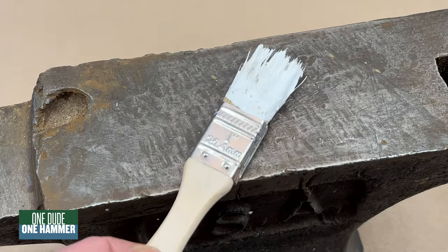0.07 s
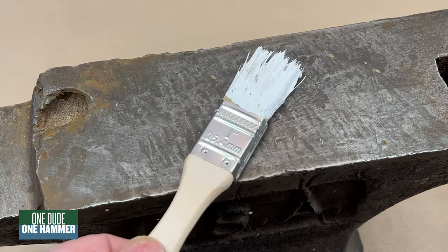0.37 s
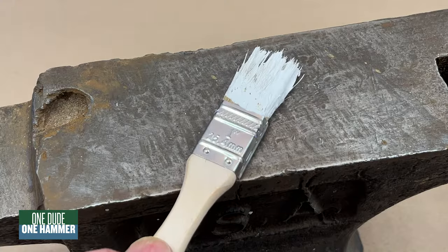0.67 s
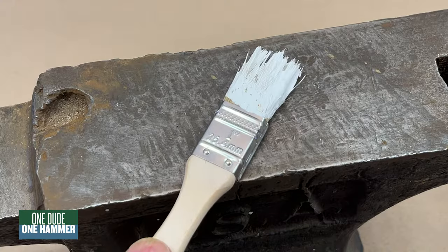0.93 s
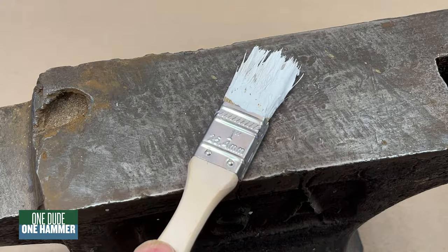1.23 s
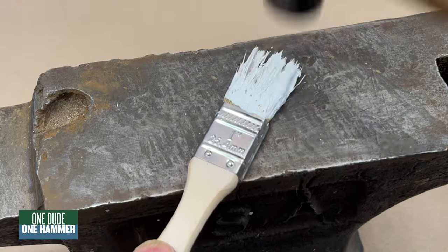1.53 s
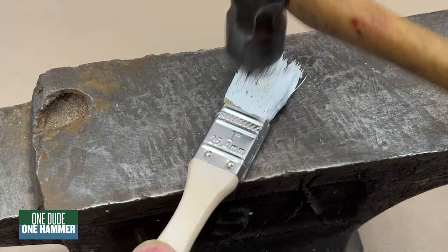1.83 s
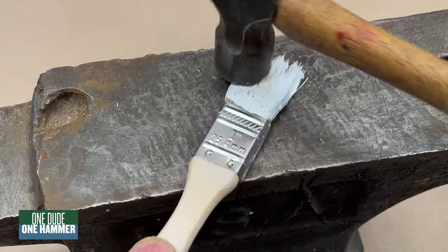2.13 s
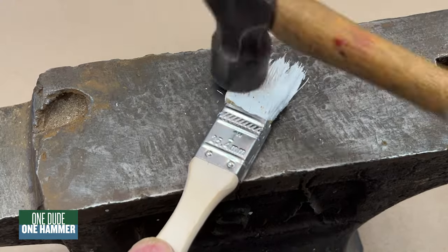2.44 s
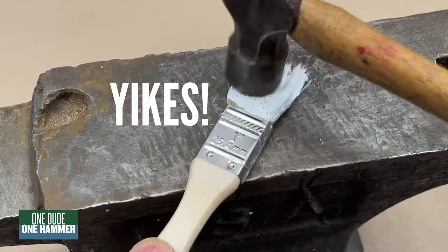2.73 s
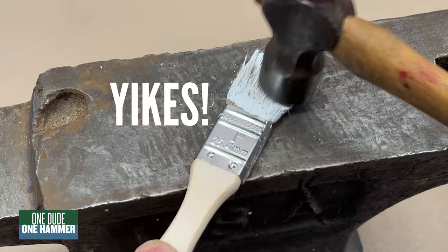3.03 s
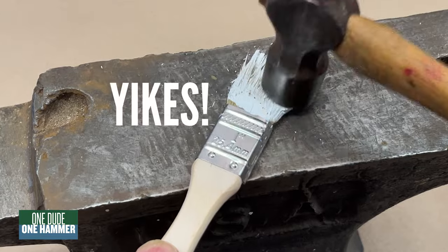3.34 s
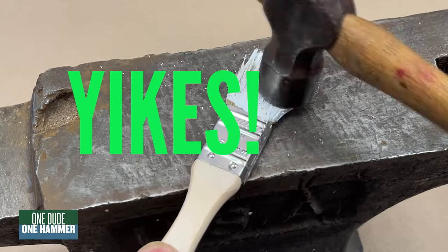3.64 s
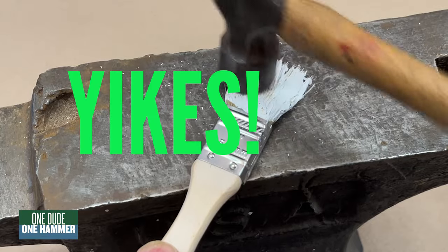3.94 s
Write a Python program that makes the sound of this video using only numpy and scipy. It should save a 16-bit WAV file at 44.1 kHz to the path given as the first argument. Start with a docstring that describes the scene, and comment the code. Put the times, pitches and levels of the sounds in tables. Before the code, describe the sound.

Hammer blows crack a paint-stiffened brush on a steel anvil, thumping and ringing faintly.

```python
"""A paintbrush stiff with dried paint slides and ticks onto a steel anvil; a faint sleeve-like swish follows.
Then nine hammer blows: each cracks the paint, knocks the hammer head and thumps the anvil's stand.
Floor and room boom after each blow; the steel rings more as the bristles flatten.
A workshop with a low hum throws the blows back to a close pair of microphones."""
import sys
import numpy as np
from scipy import signal
from scipy.fft import rfft, irfft, next_fast_len
from scipy.io import wavfile
from scipy.ndimage import uniform_filter1d

SR = 44100
rng = np.random.default_rng(int(sys.argv[2]) if len(sys.argv) > 2 else 0)


def master(y):
    """Save y as 16-bit WAV."""
    cut = np.clip(np.atleast_2d(y).T, -1, 1)
    pcm = np.round(cut * 32767)  # scale
    wavfile.write(sys.argv[1], SR, pcm.astype(np.int16))


N = 176400
T = np.arange(SR) / SR

# hammer blows (time [s], crack [dB], crack length [s], crack tilt [dB/oct], knock [dB], thump [dB],
# low ring [dB], middle ring [dB], high ring [dB], crack send to room [dB])
BLOWS = [(1.4582, -9.5, 0.0024, 1.5, -11.5, -3, -57, -44.5, -37, 6.5),
         (1.8342, -11.5, 0.0044, -.5, -6, -2, -31.5, -49.5, -50.5, -0.5),
         (2.1431, -15.5, 0.0046, 0, -0.5, -1.5, -26.5, -36.5, -41, 0),
         (2.4355, -14.5, 0.0054, -1, -1.5, -2.5, -25, -40, -43, -1.5),
         (2.7467, -12.5, 0.0036, -1.5, -1, -2.5, -24.5, -43.5, -42.5, 0.5),
         (3.0558, -8.5, 0.0028, 1.5, -3, -1.5, -29, -39, -58, -4),
         (3.3450, -11.5, 0.0022, -4.5, -3, -4, -21, -29, -40.5, 3),
         (3.6393, -9.5, 0.0026, -1.5, -2, -3, -25, -34.5, -41.5, -1),
         (3.9268, -15.5, .001, 2, -7.5, -3.5, -34, -57.5, -49, -4)]
# paint snapping after a blow (time [s], level [dB], length [s], tilt [dB/oct])
PAINT_SNAPS = [(2.1826, -21, .0007, 6), (2.4700, -38, .001, 4), (3.9300, -9, .0018, 0)]
# brush's metal band on the anvil (time [s], level [dB], length [s], tilt [dB/oct])
BAND_TICKS = [(.0324, -46, .002, -1), (.0733, -45, .0015, 0), (.2509, -54, .007, -4),
              (.3188, -56, .007, -2), (.5403, -51, .003, -5), (.7957, -42, .002, 0)]
# fracture spectrum (frequency [Hz], level [dB])
CRACK_SPECTRUM = [(100, -24.5), (700, -8), (1300, -8), (1800, 1.5), (3000, -1), (4500, -7.5), (6600, -6),
                  (9500, -9.5), (13000, -18), (15500, -15)]
# hammer head swings (frequency [Hz], level [dB], delay [s], width [s])
KNOCK_SWINGS = [(1091, -5, 0.002967, .0011), (800, -5.5, 0.004747, .0013)]
# swings of the anvil on its stand (frequency [Hz], level [dB], delay [s], width [s])
THUMP_SWINGS = [(409.4, -10, 0.00624, 0.0016), (216, 0.5, 0.01102, 0.0024), (97.5, -12, 0.0168, 0.0061)]
# brush pressed down (time [s], knock [dB], thump [dB])
BRUSH_BUMPS = [(.503, -63, -36.5), (0.52, -51, -36), (.5385, -33.5, -40), (.551, -39.5, -30)]
# anvil steel modes (frequency [Hz], level [dB], T60 [s])
STEEL_MODES = [(1846, -16, 1), (1897.7, 0.5, 0.38), (1936, -5, 0.11), (3434, 5, 0.32), (4200, -4, 0.41),
               (4570, -3, 0.28), (4660, -15.5, .42), (6796, -10, .35), (9830, -16, 0.2)]
# anchors of the low, middle and high ring levels (frequency [Hz])
RING_ANCHORS_HZ = [1900, 3436, 4161]
# low floor and room modes (frequency [Hz], level [dB], T60 [s])
ROOM_MODES = [(40.95, -28, 0.97), (51.8, -31.5, 1), (66, -21.5, 0.67), (83.8, -29.5, 0.32), (116, -29.5, 1),
              (162.9, -20.5, .45), (191, -23, 0.55), (212, -17, 0.36), (273.7, -22.5, 0.61),
              (299.8, -33, 0.5), (334, -30.5, 0.52), (425, -37, 0.52), (581, -22.5, 0.13),
              (710, -40.5, 0.42)]
# brush sliding into place, then a faint sleeve-like swish before the first blow (time [s], level [dB])
FRICTION_ENVELOPE = [(0, -57), (.1, -67), (.25, -59.5), (.34, -63), (.42, -84), (.485, -90), (0.503, -56),
                     (.6, -76), (.82, -67.5), (1.19, -86), (1.215, -67), (1.348, -71.5), (1.39, -90.5)]
# spectrum of slide and swish (frequency [Hz], level [dB])
FRICTION_SPECTRUM = [(100, -5.5), (350, -0.5), (800, -10), (1250, -0.5), (1450, -1.5), (1650, 1.5),
                     (1900, -1.5), (2800, -9), (4600, -9), (5600, -16.5), (7200, -6), (9000, -24.5),
                     (16000, -31.5)]
# thump echoes off nearby surfaces (delay [s], level [dB])
NEAR_ECHOES = [(0.0227, -11), (0.0292, -22.5), (.038, -18.5), (0.064, -26)]
# workshop tail spectrum (frequency [Hz], level [dB])
TAIL_SPECTRUM = [(40, -3), (85, -5), (130, -5), (220, -8), (400, -0.5), (720, -0.5), (1050, -10.5),
                 (1500, -4.5), (2500, -13.5), (5000, -10), (9000, -17), (15000, -8)]
# workshop tail decay (frequency [Hz], T60 [s])
TAIL_T60 = [(50, 0.55), (250, 0.43), (800, 0.54), (2000, 0.51), (5000, .48), (8000, .38), (14000, .28)]
# tail likeness between microphones (frequency [Hz], correlation [-1..1])
TAIL_CORRELATION = [(150, 0.96), (280, 0.39), (500, 0.1), (900, 0.13), (1400, -.2), (1900, 0.76), (3500, 1),
                    (16000, 1)]
# room air spectrum (frequency [Hz], level [dB])
AIR_SPECTRUM = [(25, -15.5), (60, 6), (130, -5), (200, -15), (500, -20.5), (1500, -35), (5000, -46),
                (9000, -52.5), (16000, -59)]
# microphone balance (frequency [Hz], left minus right [dB])
MIC_BALANCE = [(60, 0.9), (250, 1), (700, 3), (1200, -4), (1900, -6.5), (2600, -1), (3500, 0),
               (16000, -0.5)]
# microphone phase (frequency [Hz], left lead [rad])
MIC_PHASE = [(100, 0), (2000, .1), (3200, .5), (5000, .1), (5600, -1), (6600, -1.1), (7500, -1.9),
             (8400, -3.14), (10000, -4.7), (12000, -6.3), (15500, -9.3)]

STEEL_RISE_S, ROOM_DELAY_S, ROOM_RISE_S = 0.0039, 0.027, 0.00089
TAIL_DELAY_S, TAIL_RISE_S, TAIL_BUILD_CYCLES = 0.006, 0.0028, 1
AIR_DB, HUM_HZ, HUM_DB = -60.5, 117.8, -54
LOW_CUT_HZ, HIGH_CUT_HZ = 33, 16100


def crack(db, length_s, tilt_db_oct, size=2048, evenness=0.3):
    """Burst of tiny fractures: ragged at the microphones, smooth summed over all directions."""
    hz = np.fft.rfftfreq(size, 1 / SR)
    envelope = np.exp(-(T[:size] / length_s) ** 2)
    colour = amp(lookup(CRACK_SPECTRUM, hz) + tilt_db_oct * np.log2(np.maximum(hz, 1000) / 3000))
    log_gain = np.log(np.concatenate([colour, colour[-2:0:-1]]))
    min_phase = np.exp(signal.hilbert(log_gain).conj())[:len(hz)]
    burst = rfft(rng.standard_normal(size) * envelope)
    fractures = irfft(burst / (abs(burst) + 1e-9) ** evenness) * np.sqrt(envelope)
    level = amp(db) * np.sqrt(np.mean(envelope ** 2))
    return level * unit_rms(irfft(rfft(fractures) * min_phase)), level * unit_rms(irfft(min_phase))


def cracks_and_ticks():
    """Dried paint cracks, the metal band ticks: direct sound and room send."""
    direct, send = np.zeros((2, N))
    events = [(*row[:4], row[-1]) for row in BLOWS] + [(*row, 0) for row in PAINT_SNAPS + BAND_TICKS]
    for time_s, db, length_s, tilt_db_oct, send_db in events:
        ragged, smooth = crack(db, length_s, tilt_db_oct)
        add(direct, time_s, ragged)
        add(send, time_s, amp(send_db) * smooth)
    return direct, send


def swings(table):
    """Short rounded swings of a heavy part."""
    return sum(-amp(db) * np.sin(2 * np.pi * hz * (T - delay_s))
               * np.exp(-0.5 * ((T - delay_s) / width_s) ** 2) for hz, db, delay_s, width_s in table)


def impacts():
    """Knock and thump of each hammer blow and brush bump."""
    knocks, thumps = np.zeros((2, N))
    knock, thump = swings(KNOCK_SWINGS), swings(THUMP_SWINGS)
    for time_s, knock_db, thump_db in [(row[0], row[4], row[5]) for row in BLOWS] + BRUSH_BUMPS:
        add(knocks, time_s, amp(knock_db) * knock)
        add(thumps, time_s, amp(thump_db) * thump)
    return knocks, thumps


def ring(hz, t60_s, delay_s, rise_s):
    """One mode: fast swell, exponential decay."""
    t = np.maximum(T - delay_s, 0)
    return np.sin(2 * np.pi * hz * t) * (1 - np.exp(-t / rise_s)) * np.exp(-np.log(1000) * t / t60_s)


def anvil_and_boom():
    """Each blow rings the steel; a low boom of floor and room follows."""
    out = np.zeros(N)
    boom = sum(amp(db) * ring(hz, t60_s, ROOM_DELAY_S, ROOM_RISE_S) for hz, db, t60_s in ROOM_MODES)
    steel = [(hz, amp(db) * ring(hz, t60_s, 0, STEEL_RISE_S)) for hz, db, t60_s in STEEL_MODES]
    for time_s, _, _, _, _, thump_db, *ring_db, _ in BLOWS:
        add(out, time_s, amp(thump_db) * boom)
        for hz, mode in steel:
            add(out, time_s, amp(np.interp(hz, RING_ANCHORS_HZ, ring_db)) * mode)
    return out


def slide_and_swish():
    """Grainy friction: the brush slides into place, then a faint sleeve-like swish."""
    time_s, db = np.transpose(FRICTION_ENVELOPE)
    grain_db = 2.4 * unit_rms(uniform_filter1d(rng.standard_normal(N), size=300))
    return noise(FRICTION_SPECTRUM) * amp(np.interp(np.arange(N) / SR, time_s, db) + grain_db)


def workshop(send):
    """Diffuse stereo tail: decay set per band, bass building more slowly than treble."""
    hz, t, white = signal.stft(rng.standard_normal((2, SR)), SR, nperseg=512)
    hz = hz[:, None]
    correlation = lookup(TAIL_CORRELATION, hz)
    mid = np.sqrt((1 + correlation) / 2) * white[0]
    side = np.sqrt((1 - correlation) / 2) * white[1]
    decay_per_s = np.log(1000) / lookup(TAIL_T60, hz)
    decay = np.exp(-decay_per_s * t) * np.sqrt(2 * decay_per_s / SR)
    build = 1 - np.exp(-(t + t[1]) * hz / TAIL_BUILD_CYCLES)
    bands = np.array([mid + side, mid - side]) * amp(lookup(TAIL_SPECTRUM, hz)) * decay * build
    onset = np.clip((T - TAIL_DELAY_S) / TAIL_RISE_S, 0, 1)
    tail = signal.istft(bands, SR, nperseg=512)[1][:, :SR] * onset
    return signal.fftconvolve(send[None], tail, axes=1)[:, :N]


def background():
    """Quiet room air and mains hum."""
    hum = np.sin(2 * np.pi * HUM_HZ * np.arange(N) / SR)
    return amp(AIR_DB) * noise(AIR_SPECTRUM) + amp(HUM_DB) * hum


def noise(spectrum):
    """Steady shaped noise, rms 1."""
    gain = amp(lookup(spectrum, np.fft.rfftfreq(N, 1 / SR)))
    return unit_rms(irfft(rfft(rng.standard_normal(N)) * gain, N))


def amp(db):
    """Decibels to gain."""
    return 10 ** (np.asarray(db) / 20)


def unit_rms(x):
    """Scales to rms 1."""
    return x / np.sqrt(np.mean(x ** 2) + 1e-20)


def lookup(table, hz):
    """Interpolates on a log-frequency axis."""
    table_hz, values = np.transpose(table)
    return np.interp(np.log(hz + 1), np.log(table_hz + 1), values)


def add(mix, time_s, sound):
    """Mixes a sound in at time_s."""
    part = mix[round(time_s * SR):][:len(sound)]
    part += sound[:len(part)]


def scene():
    """Direct sound, near echoes, workshop tail, background."""
    knocks, thumps = impacts()
    cracks, crack_send = cracks_and_ticks()
    body = knocks + thumps + slide_and_swish()
    echoes = np.zeros(N)
    for delay_s, db in NEAR_ECHOES:
        add(echoes, delay_s, amp(db) * thumps)
    return cracks + body + echoes + anvil_and_boom() + workshop(body + crack_send) + background()


def record(dry):
    """Microphone pair: level and phase offsets, soft clip, band limits."""
    size = next_fast_len(N + SR)
    hz = np.fft.rfftfreq(size, 1 / SR)
    balance = amp(lookup(MIC_BALANCE, hz) / 2)
    pair = np.array([balance * np.exp(1j * lookup(MIC_PHASE, hz)), 1 / balance])
    heard = irfft(rfft(dry, size) * pair, size)[:, :N]
    rounded = heard / (1 + heard ** 4) ** (1 / 4)
    low_cut = signal.butter(2, LOW_CUT_HZ, "highpass", fs=SR, output="sos")
    high_cut = signal.firwin(255, HIGH_CUT_HZ, window=("kaiser", 9), fs=SR)
    return signal.oaconvolve(signal.sosfilt(low_cut, rounded), high_cut[None], "same")


dry = scene()
out = record(dry)
master(out)
```